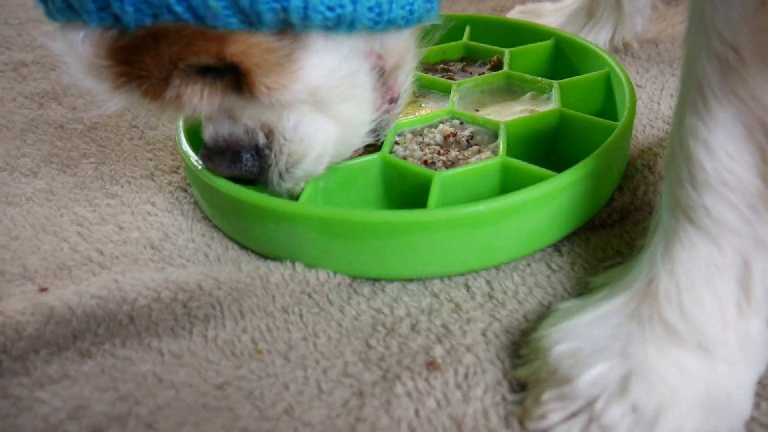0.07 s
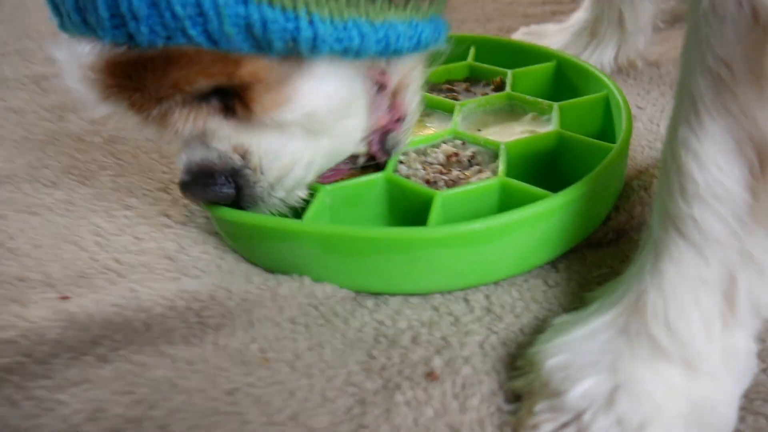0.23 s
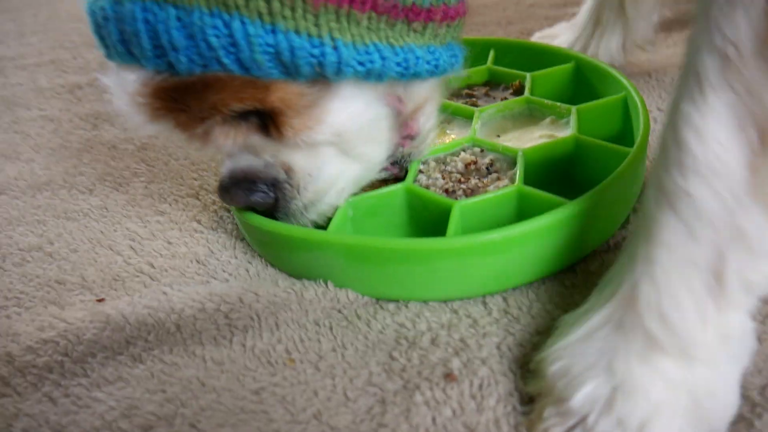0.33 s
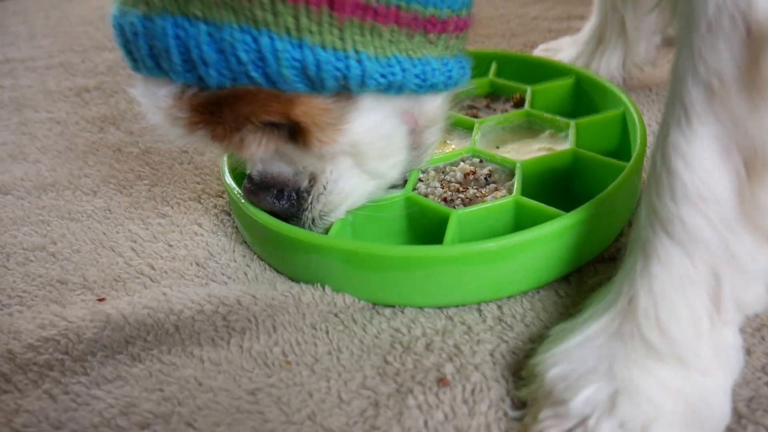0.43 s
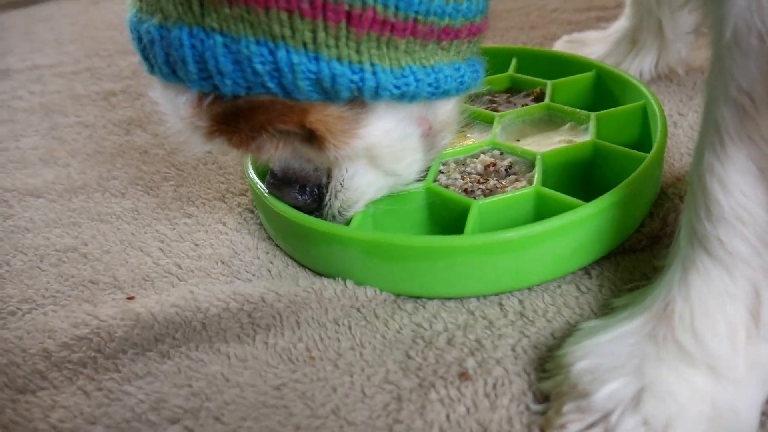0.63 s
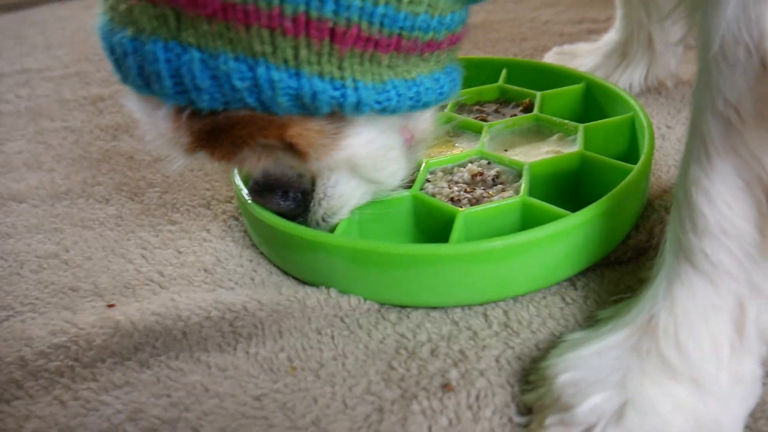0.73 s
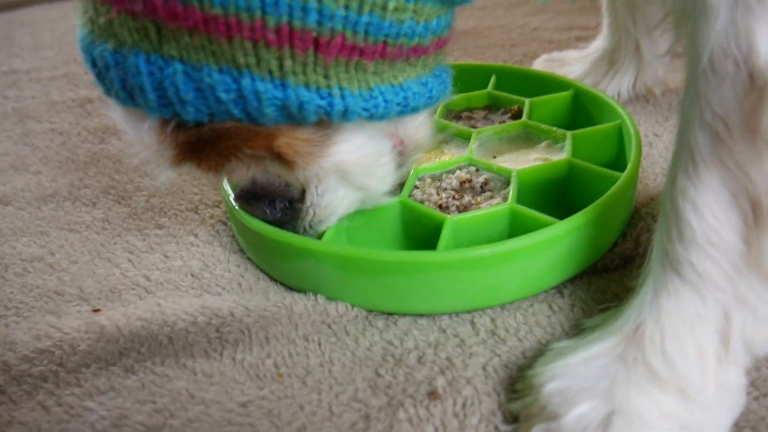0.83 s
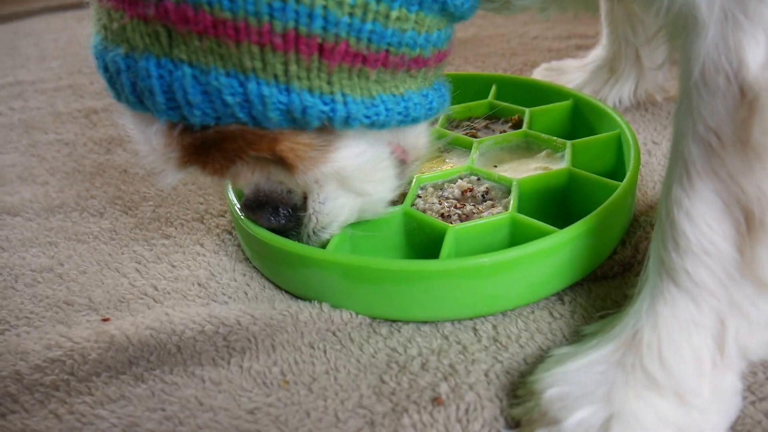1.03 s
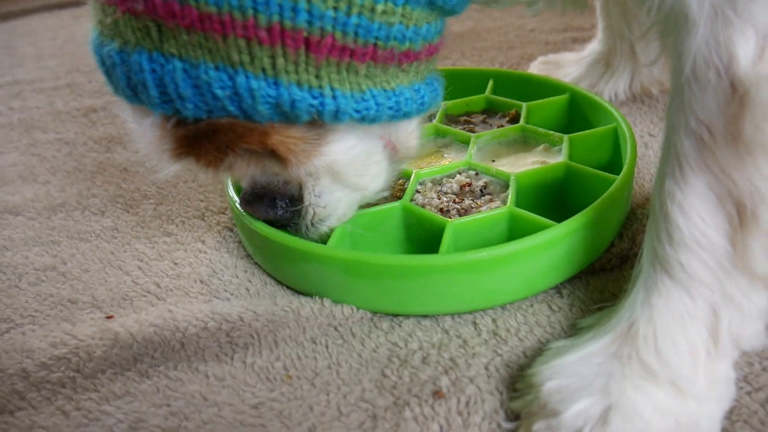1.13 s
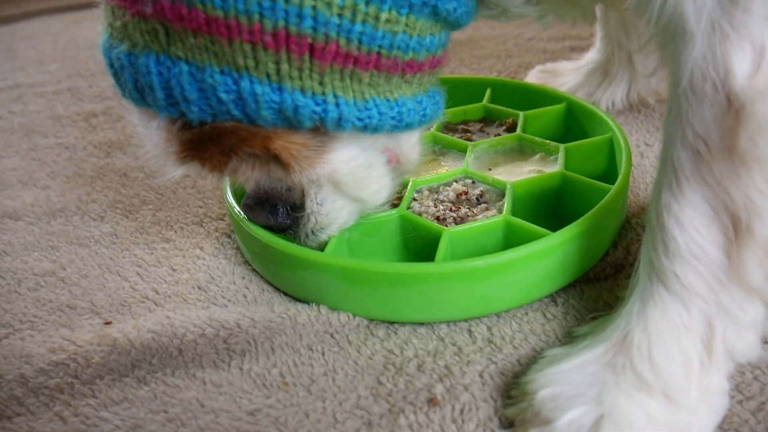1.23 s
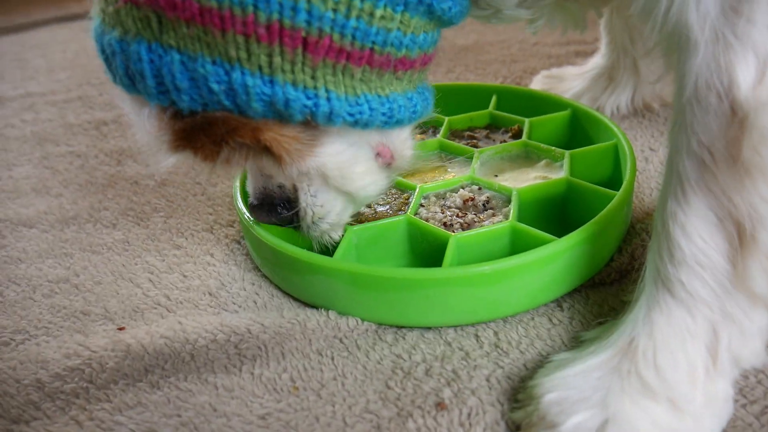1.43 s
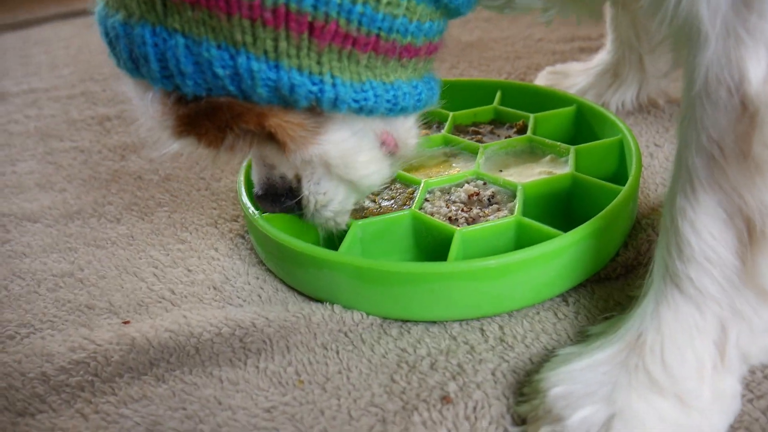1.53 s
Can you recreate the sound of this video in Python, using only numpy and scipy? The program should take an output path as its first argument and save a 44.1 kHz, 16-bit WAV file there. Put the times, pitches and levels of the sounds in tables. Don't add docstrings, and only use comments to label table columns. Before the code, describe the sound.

Close-up dog licking and chewing: raspy wet tongue drags and pops, low thuds, a loud hollow crunch near half a second, then small clicks and a late short lick in a quiet carpeted room.

```python
import sys
import numpy as np
from scipy import signal
from scipy.io import wavfile

SR = 44100
rng = np.random.default_rng(int(sys.argv[2]) if len(sys.argv) > 2 else 0)


def waveform_to_disk(signal):
    frames = np.transpose(np.atleast_2d(signal))
    scaled = np.clip(frames, -1, 1) * 32767
    samples = np.round(scaled).astype(np.int16)
    wavfile.write(sys.argv[1], SR, samples)


def voltage_ratio(decibels):
    exponent = np.asarray(decibels, float) / 20
    return 10 ** exponent


N = 70560

SIDES = np.array([[1], [-1]])


def rms_one(x):
    return x / np.sqrt(np.mean(x ** 2) + 1e-20)


def at_hz(points, hz):
    point_hz, value = np.transpose(points)
    return np.interp(np.log(hz), np.log(point_hz), value)


def low_pass(x, cut_hz, order):
    return signal.sosfilt(signal.butter(order, cut_hz, fs=SR, output="sos"), x)


def band_pass(x, low_hz, high_hz, order=2):
    return signal.sosfilt(signal.butter(order, [low_hz, high_hz], "band", fs=SR, output="sos"), x)


def drift(rate_hz):
    r = np.exp(-80 * np.pi * rate_hz / SR)
    chance = rng.standard_normal(N // 40 + 2002)
    slow = signal.lfilter([1], [1, -2 * r, r * r], chance)[2000:]
    return np.interp(np.arange(N) / 40, np.arange(len(slow)), rms_one(slow))


def two_pole(hz, width_hz):
    r = np.exp(-np.pi * width_hz / SR)
    return [(1 - r * r) / 2, 0, (r * r - 1) / 2], [1, -2 * r * np.cos(2 * np.pi * hz / SR), r * r]


def resonate(x, hz, width_hz):
    return signal.lfilter(*two_pole(hz, width_hz), x)


def gliding(x, rows, width_hz):
    out, state = np.zeros_like(x), np.zeros((2, 2, 2))
    for i in range(0, N, 256):
        hz = np.interp(i / SR, *np.transpose(rows))
        b, a = two_pole(hz, width_hz)
        out[:, i:i + 256], state = signal.sosfilt([b + a, b + a], x[:, i:i + 256], zi=state)
    return out


def fade(s, t60, rise_s, hz=0):
    out, first, t60 = np.zeros(N), int(s * SR) + 1, max(t60, .002)
    t = np.arange(first, min(N, first + int(2 * t60 * SR))) / SR - s
    shape = voltage_ratio(-60 * t / t60) * (1 - np.exp(-t / rise_s)) ** 2
    out[first:first + len(t)] = -shape * np.sin(2 * np.pi * hz * t) if hz else shape
    return out


def ring(s, hz, t60, rise_s):
    return fade(s, t60, rise_s, hz)


def banded_noise(spectrum, patchy_db):
    # hz, correlation
    likeness = [(60, 1), (200, 0.69), (400, -0.37), (2400, -0.13), (8000, 0.63), (15000, .4)]
    out, band_edges = 0, 25 * 2 ** np.arange(0, 9.6, .5)
    white = rng.standard_normal((2, 2, N))
    for k, (low_hz, high_hz) in enumerate(zip(band_edges, band_edges[1:])):
        mid, side = band_pass(white[k % 2], low_hz, high_hz)
        hz = np.sqrt(low_hz * high_hz)
        alike = np.clip(at_hz(likeness, hz), -1, 1)
        stereo = np.sqrt(1 + alike) * mid + np.sqrt(1 - alike) * side * SIDES
        out = out + voltage_ratio(at_hz(spectrum, hz) + patchy_db * drift(10)) * stereo
    return rms_one(out)


def tongue():
    # start_s, level_db, hollow_ring_db
    tongue_drag = [(0, -47, 6.5), (0.034, -47.5, 12), (.04, -42, 3.5), (.085, -39.5, 4), (0.111, -43, 5.5),
                   (0.152, -55, 11.5), (0.227, -57, 23), (0.248, -39.5, 5), (0.281, -49, 6.5),
                   (.33, -51.5, -2.5), (.46, -52, -1.5), (0.499, -49.5, 13), (.62, -54, -13),
                   (.72, -77, -26), (1.139, -68, -3), (1.177, -51, -2), (1.2, -48.5, -3.5), (1.23, -66, -6)]
    # pitch_hz, width_hz, level_db
    cell_modes = [(2300, 1100, -8.5), (4300, 1000, -8.5), (6000, 1460, -17), (10000, 4000, -5.5)]
    # pitch_hz, width_hz, level_db
    boom_modes = [(299.4, 340, -13), (700, 660, -6.5), (1160, 700, -7.5)]
    # start_s, pitch_hz
    hollow_pitch = [(0, 1596), (.09, 1537), (.125, 1720), (.19, 1498), (.23, 1440), (.5, 1526),
                    (1.15, 1800), (1.6, 1650)]
    grains_per_s, spread_db, flutter_db = 5000, .5, 1
    sizes = voltage_ratio(spread_db * np.minimum(rng.exponential(1, (2, N)), 5)) * rng.choice([-1, 1], (2, N))
    mid, side = sizes * (rng.random((2, N)) < grains_per_s / SR)
    grains = low_pass(mid + voltage_ratio(-13) * side * SIDES, 10270, order=4)

    body = sum(voltage_ratio(db + flutter_db * drift(27)) * resonate(grains, hz, width_hz)
               for hz, width_hz, db in cell_modes)
    hollow = gliding(grains, hollow_pitch, width_hz=320)
    hollow = hollow + sum(voltage_ratio(db) * resonate(grains, hz, width_hz) for hz, width_hz, db in boom_modes)
    start_s, level_db, hollow_db = np.transpose(tongue_drag)
    t = np.arange(N) / SR
    hollow_gain = voltage_ratio(np.interp(t, start_s, hollow_db) + 4.5 + flutter_db * drift(59))
    stroke = voltage_ratio(np.interp(t, start_s, level_db)) * rms_one(body + hollow_gain * hollow)

    rasp = rms_one(resonate(grains, hz=4300, width_hz=860))
    return stroke + voltage_ratio(-51.5) * fade(.031, t60=.5, rise_s=.002) * rasp


def hush():
    # pitch_hz, level_db per Hz
    hush_spectrum = [(35, 1), (100, 0.5), (260, -2), (480, -8), (1500, -16), (3000, -23.5), (9500, -30),
                     (15000, -34.5)]
    return voltage_ratio(-54) * banded_noise(hush_spectrum, patchy_db=1)


def snaps():
    # start_s, peak_db, low_hz, high_hz
    film_snaps = [(.0365, -37, 3460, 6400), (0.2375, -31, 3020, 4950), (.2567, -54, 2600, 4500),
                  (0.5558, -44.5, 2500, 5000), (.821, -46.5, 700, 4600), (0.8812, -54, 3500, 5410),
                  (1.0018, -58, 500, 2600), (1.109, -48.5, 510, 3200), (1.2103, -48, 602, 4860),
                  (1.328, -45.5, 604, 5790), (1.404, -44.5, 700, 6450), (1.5095, -49, 3500, 7050),
                  (1.5562, -45, 500, 2770)]
    echo_s, echo_db = .00138, -4.5
    out = np.zeros(N)
    for s, db, low_hz, high_hz in film_snaps:
        click = np.zeros(400)
        click[[0, int(echo_s * SR)]] = -1, voltage_ratio(echo_db)
        click = band_pass(click, low_hz, high_hz)
        first = int(s * SR)
        out[first:first + len(click)] += voltage_ratio(db) * click / np.abs(click).max()
    return out


def gulps():
    # start_s, level_db, pitch_hz, t60_s
    air_pockets = [
        (.0422, -13.5, 1600, .014),
        (1.246, -38, 1740, .022),
        (1.555, -17, 1620, .012),
    ]
    return sum(voltage_ratio(db) * ring(s, hz, t60, rise_s=.002) for s, db, hz, t60 in air_pockets)


def pops():
    # start_s, peak_db, pitch_hz, t60_s
    pops_and_crackle = [(.061, -31.5, 1632, 0.053), (.246, -21.5, 2270, 0.01), (.2375, -23, 598, 0.035),
                        (.2422, -19, 2185, 0.013), (.2567, -23.5, 2204, 0.019), (0.2954, -15.5, 466, 0.02),
                        (.2962, -18, 900, 0.018), (0.2951, -23, 1640, 0.0094), (0.532, -31, 1700, .016),
                        (0.565, -24.5, 474, 0.024), (.5652, -25, 1040, 0.012), (.6586, -31, 1790, 0.011),
                        (.6782, -31.5, 1450, 0.0088), (0.8206, -45, 1910, 0.012), (0.821, -50, 3885, 0.012),
                        (1.001, -29.5, 1114, 0.0049), (1.11, -46, 895, 0.023), (1.212, -32, 2300, 0.0059),
                        (1.2113, -41, 760, 0.015), (1.327, -39.5, 1940, 0.0071), (1.403, -44, 2063, 0.011),
                        (1.2115, -41.5, 3600, 0.0094), (1.3283, -43, 3520, 0.0051), (1.4035, -39.5, 3420, 0.0051),
                        (1.416, -36.5, 330, 0.024), (1.4867, -25, 248.2, .01), (1.491, -31.5, 1015, 0.013),
                        (1.547, -46, 1570, 0.013),
                        (0.2383, -24, 1310, 0.011), (.2405, -37, 593, 0.016), (.2455, -22, 744, .012),
                   (0.251, -36, 1510, 0.0065), (.2568, -30, 700, 0.013), (.2603, -34, 2200, 0.011),
                   (0.268, -34, 1580, 0.013), (.4975, -21.5, 3540, 0.0046), (0.4983, -27.5, 4300, 0.011),
                   (.5006, -11, 1090, .012), (0.5232, -29, 1050, 0.015), (.531, -30.5, 1340, 0.017),
                   (0.5379, -29, 900, .01), (0.547, -36, 1470, 0.011), (.5575, -30, 555, .016),
                   (0.5592, -32, 1570, .01), (0.5717, -42, 1470, 0.01), (.594, -31.5, 1100, 0.0089),
                   (.6783, -33, 880, 0.0094), (0.679, -47.5, 4450, 0.0093), (0.8906, -49, 1950, .01),
                   (1.179, -48, 1800, 0.027), (1.19, -48, 1640, .03), (1.4852, -40, 1100, .007),
                   (1.5575, -37.5, 576, 0.013)]
    rise_s, splat_share = .00034, .29
    noise, out = rng.standard_normal(N), 0
    for s, db, hz, t60 in pops_and_crackle:
        main = ring(s, hz, t60, rise_s)
        under = voltage_ratio(-20) * ring(s, .55 * hz, t60, rise_s)
        over = voltage_ratio(-27) * ring(s, 2.6 * hz, 1.7 * t60, rise_s)
        splat = rms_one(band_pass(noise, .3 * hz, 1.6 * hz, order=3))
        splat = voltage_ratio(-10.5) * splat * fade(s, splat_share * t60, rise_s)
        out = out + voltage_ratio(db) * (main + under + over + splat)
    return out


def thuds():
    # start_s, peak_db, pitch_hz, t60_s
    floor_thuds = [(0.17, -39, 163, 0.07), (.298, -28, 97, 0.2), (0.326, -38, 101, 0.094),
                   (0.375, -59, 113.6, 0.12), (0.498, -32, 103.5, 0.32), (0.516, -25, 93, 0.099),
                   (0.5691, -28, 98.1, 0.18), (.686, -50, 110.3, .05), (1.208, -26, 135, 0.029),
                   (1.415, -46, 143, 0.17), (1.488, -26, 131, 0.048)]
    # start_s, peak_db, pitch_hz, t60_s
    rim_taps = [
        (.6613, -27, 270, .013),
        (.6798, -24.5, 215, .012),
    ]
    taps = sum(voltage_ratio(db) * ring(s, hz, t60, rise_s=.0003) for s, db, hz, t60 in rim_taps)
    floor = sum(voltage_ratio(db) * ring(s, hz, t60, rise_s=.0042) for s, db, hz, t60 in floor_thuds)
    return floor - taps


def ticks():
    # start_s, peak_db, pitch_hz
    saliva_ticks = [(0.24, -27, 10000), (.243, -19.5, 3810), (0.2966, -27.5, 10600), (.321, -40, 11000),
                    (0.353, -34.5, 10700), (0.4278, -38.5, 9200), (.452, -39.5, 7000), (0.4662, -43, 9500),
                    (.475, -40, 8500), (.3065, -34, 10900), (0.457, -33.5, 10200), (0.4829, -22, 6840),
                    (0.4993, -26.5, 10500), (.487, -16, 6900), (0.4933, -21.5, 6740), (0.4982, -21, 9500),
                    (0.534, -31, 10700), (0.5554, -27.5, 10200), (.601, -31.5, 6800), (0.6096, -28, 10700),
                    (0.6136, -36, 9200), (0.658, -42.5, 12200), (.665, -35.5, 12850), (0.7306, -45, 10260),
                    (0.7936, -47.5, 9550), (0.861, -44, 12730), (.8822, -47.5, 9680), (.8915, -45, 9800),
                    (.8953, -32.5, 8940), (.9, -45, 8500), (.9052, -53, 11700), (0.9107, -45, 9200),
                    (.898, -37, 3706), (.9245, -44.5, 10900), (1.128, -40.5, 9900), (1.191, -39.5, 10000),
                    (1.5103, -40.5, 5530), (1.5902, -45.5, 11800)]
    mid, side = rng.standard_normal((2, N))
    noise = mid + voltage_ratio(-11) * side * SIDES
    broad = voltage_ratio(-3.5) * band_pass(noise, 5500, 12500)
    out = 0
    for s, db, hz in saliva_ticks:
        envelope = fade(s, .0055, rise_s=.00047) + voltage_ratio(-22.5) * fade(s, .047, rise_s=.00089)
        pitched = rms_one(resonate(noise, hz, width_hz=.16 * hz))
        out = out + voltage_ratio(db - 2.5) * envelope * (pitched + broad)
    return out


def shudders():
    # start_s, level_db, t60_s
    blows = [
        (0.244, -46, 0.21),
        (0.298, -40.5, 0.31),
        (0.499, -33, 0.27),
        (0.562, -49, 0.38),
        (0.657, -51.5, 0.23),
        (1.493, -59, 0.9),
    ]
    # pitch_hz, level_db per Hz
    shudder_spectrum = [(100, 2.5), (200, -1.5), (480, -4.5), (900, -7), (1500, -7), (2200, -22.5),
                        (3200, -33)]
    left, right = banded_noise(shudder_spectrum + [(4500, -60)], patchy_db=2.5)
    lumps = voltage_ratio(2.5 * drift(90))
    envelope = sum(voltage_ratio(db) * fade(s, t60, rise_s=.00067) for s, db, t60 in blows)
    return (left + .31 * right * SIDES) * lumps * envelope


def squeaks():
    # start_s, length_s, start_hz, end_hz, level_db
    wet_squeaks = [
        (.3265, .015, 11300, 9100, -47),
        (.341, .008, 11300, 10300, -51),
    ]
    out = np.zeros(N)
    for s, length_s, start_hz, end_hz, db in wet_squeaks:
        u = np.clip((np.arange(N) / SR - s) / length_s, 0, 1)
        cycles = length_s * (start_hz * u + (end_hz - start_hz) * u * u / 2)
        out += voltage_ratio(db + 2 * drift(140)) * np.sin(np.pi * u ** .5) * np.sin(2 * np.pi * cycles)
    return out


def bites():
    # start_s, peak_db
    tooth_cracks = [
        (.4838, -40),
        (.4872, -29),
        (.4935, -37),
        (.498, -8),
        (.5003, -2),
    ]
    # pitch_hz, level_db, t60_s
    bowl_modes = [(330, -12, 0.01), (594, -5.5, 0.013), (730, -6.5, .007), (900, 1, 0.0077),
                  (1080, -4, .006), (1255, 0.5, .007), (1498, 11, 0.0076), (1800, -8, 0.021)]
    noise = band_pass(rng.standard_normal(N), 4000, 11500)
    modes = sum(voltage_ratio(db + mode_db) * ring(s, hz, t60, rise_s=.00027)
                for s, db in tooth_cracks for hz, mode_db, t60 in bowl_modes)
    crack = sum(voltage_ratio(db - 20) * fade(s, .007, rise_s=.0015) for s, db in tooth_cracks)
    return low_pass(modes, 1540, order=3) + noise * crack


def room(x):
    t60_s, wall_cut_hz = 1, 1200
    out, dull = np.zeros((2, N)), np.exp(-2 * np.pi * wall_cut_hz / SR)
    lags = (rng.uniform(.006, .03, 16) * SR).astype(int)
    for k, lag in enumerate(lags):
        loop, gain, state = x.copy(), voltage_ratio(-60 * lag / SR / t60_s), [0.]
        for i in range(lag, N, lag):
            back, state = signal.lfilter([gain * (1 - dull)], [1, -dull], loop[i - lag:i], zi=state)
            loop[i:i + lag] += back[:N - i]
        out[k % 2] += (loop - x) * (-1) ** (k // 2)
    return out


def scene():
    body = tongue() + snaps() + gulps() + pops() + bites()
    wet = ticks() + squeaks()
    near = body * voltage_ratio(.5 * SIDES) + wet * voltage_ratio(-.2 * SIDES)
    near = near + thuds() + shudders()
    return near + voltage_ratio(-31) * room(near.mean(axis=0)) + hush()


def roll_off(x):
    return signal.sosfilt(signal.butter(12, 16490, fs=SR, output="sos"), x)


def record(dry):
    x = signal.sosfilt(signal.butter(4, 78.6, "high", fs=SR, output="sos"), dry)
    x = x - .85 * resonate(x, hz=7880, width_hz=200)
    x = signal.sosfilt(signal.cheby2(10, 60, 15900 * 1.04, fs=SR, output="sos"), x)
    return roll_off(x)


dry = scene()
out = record(dry)
waveform_to_disk(out)
```